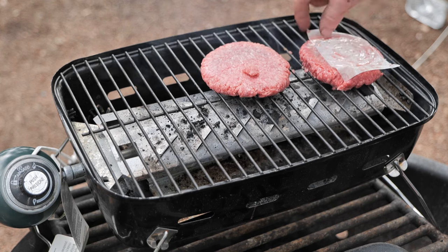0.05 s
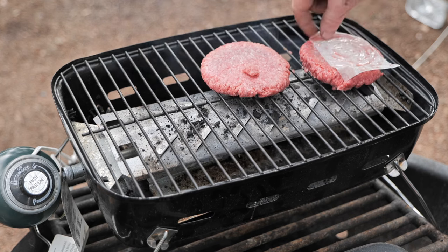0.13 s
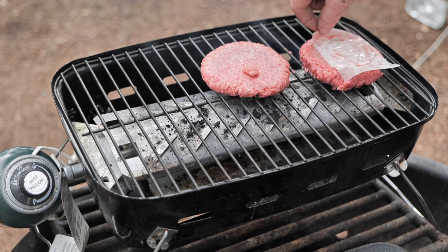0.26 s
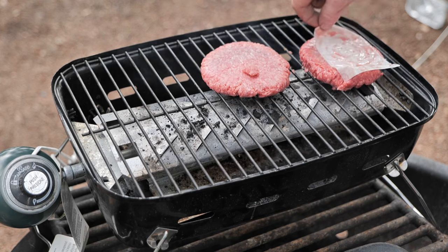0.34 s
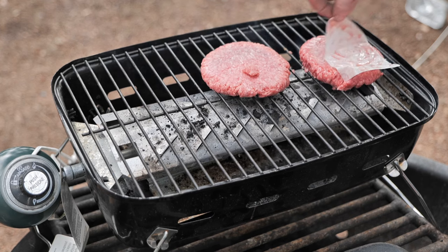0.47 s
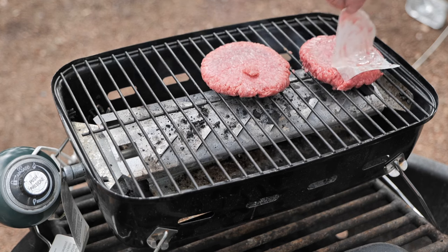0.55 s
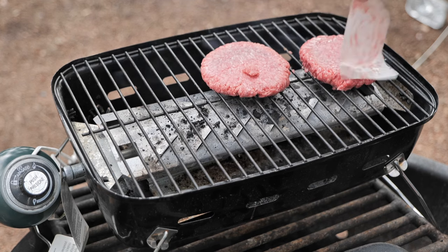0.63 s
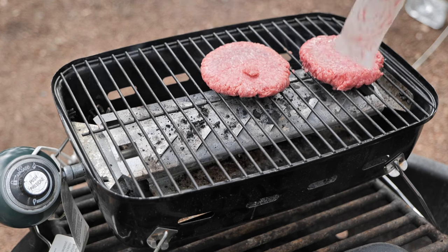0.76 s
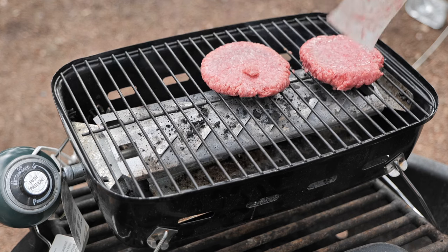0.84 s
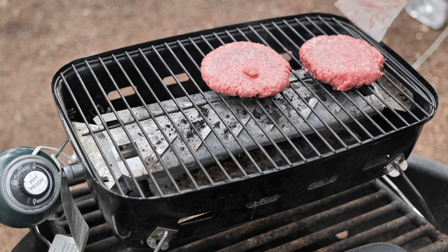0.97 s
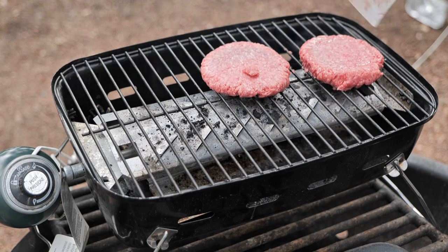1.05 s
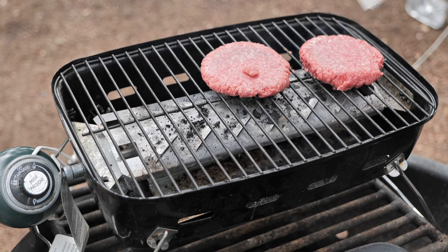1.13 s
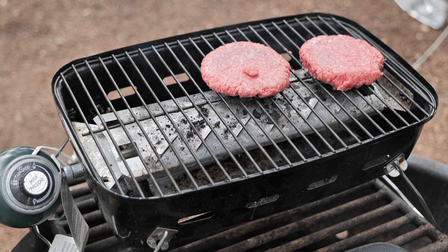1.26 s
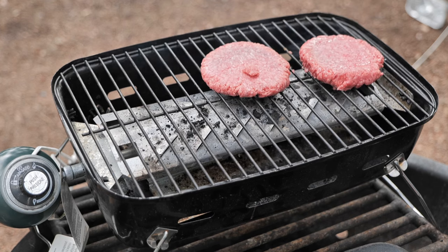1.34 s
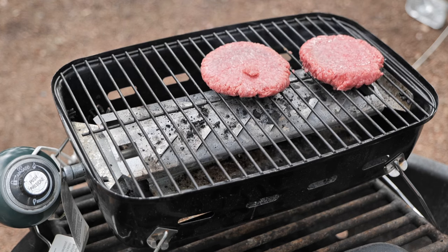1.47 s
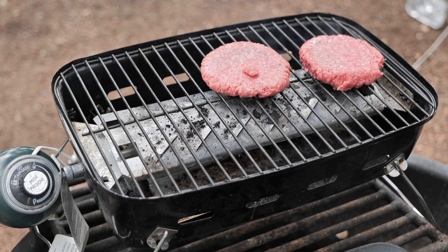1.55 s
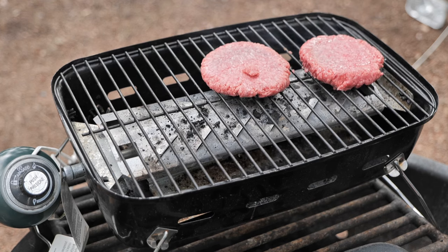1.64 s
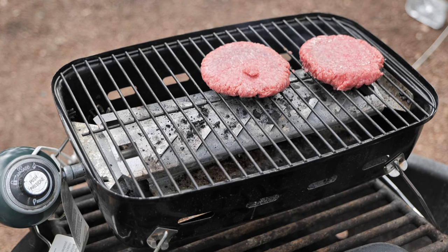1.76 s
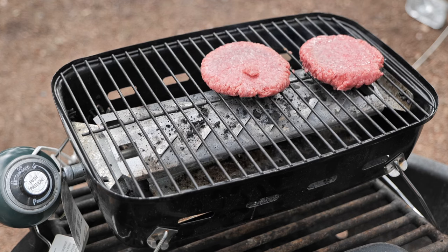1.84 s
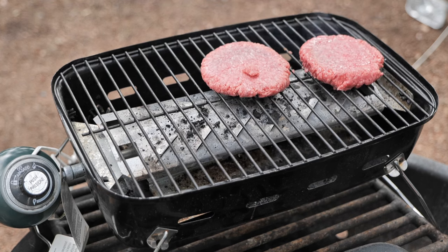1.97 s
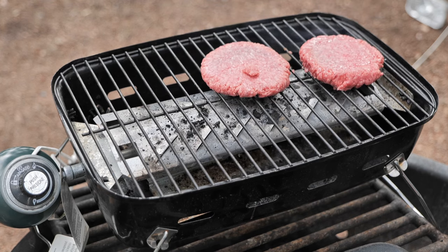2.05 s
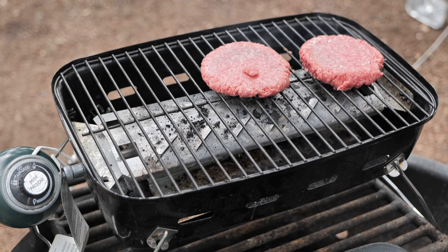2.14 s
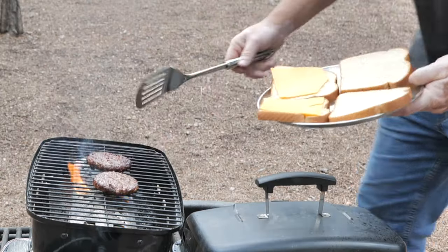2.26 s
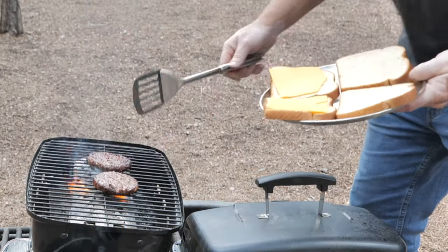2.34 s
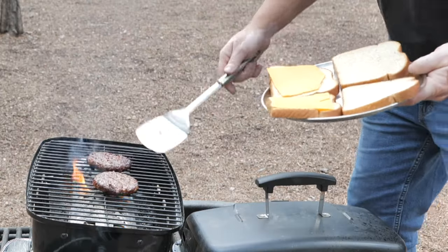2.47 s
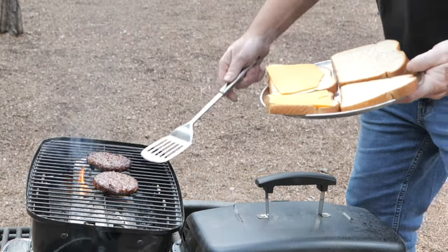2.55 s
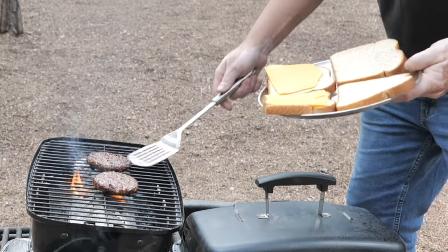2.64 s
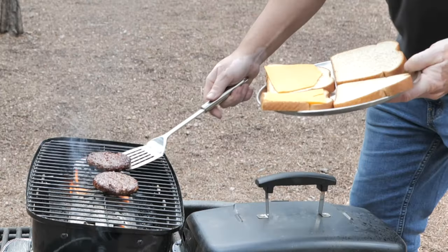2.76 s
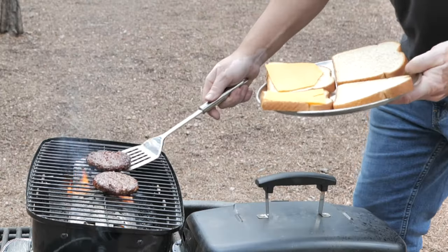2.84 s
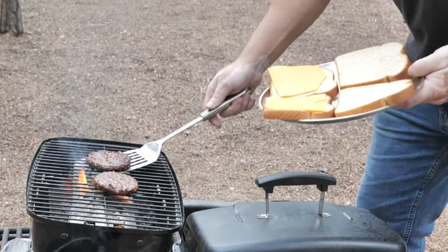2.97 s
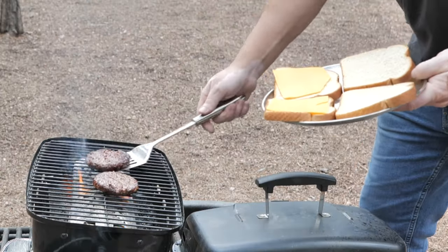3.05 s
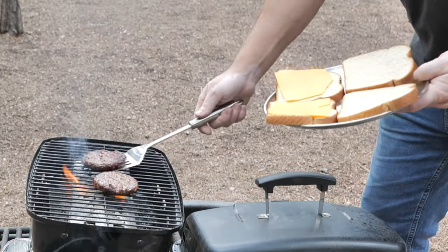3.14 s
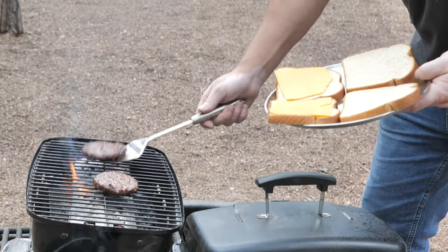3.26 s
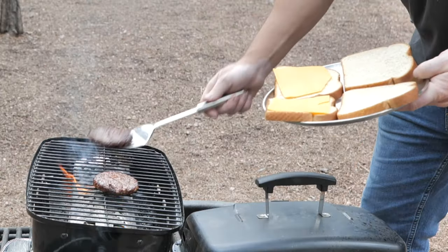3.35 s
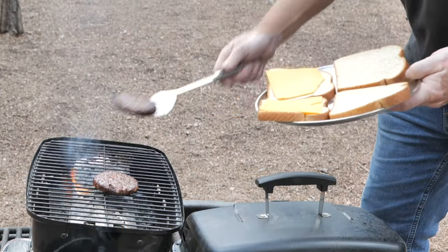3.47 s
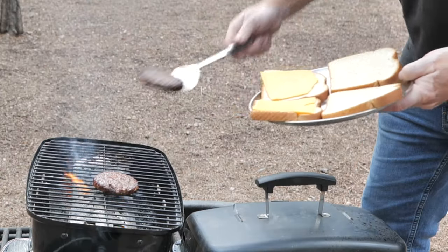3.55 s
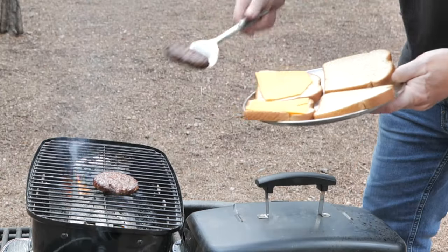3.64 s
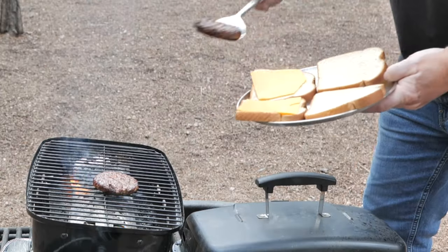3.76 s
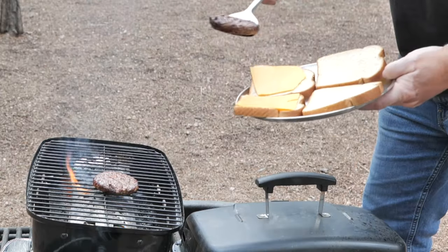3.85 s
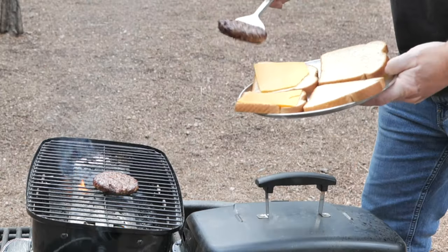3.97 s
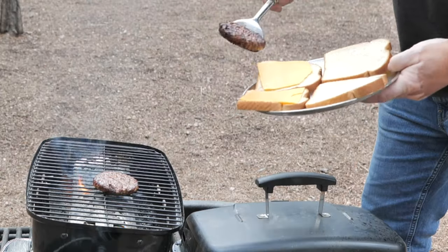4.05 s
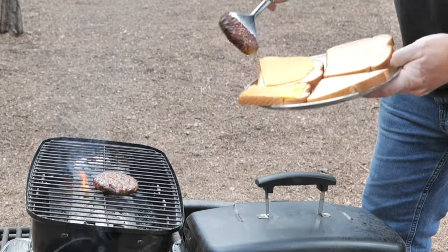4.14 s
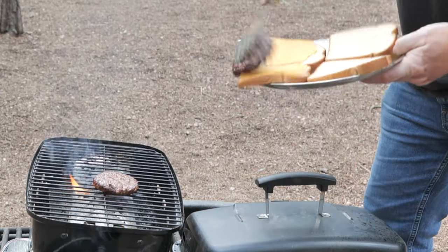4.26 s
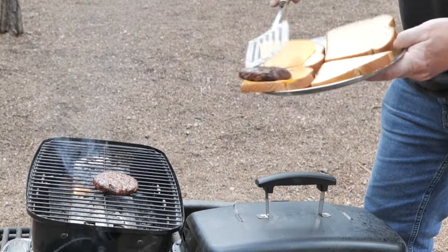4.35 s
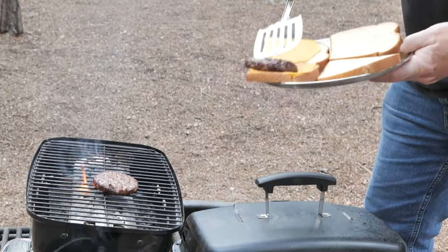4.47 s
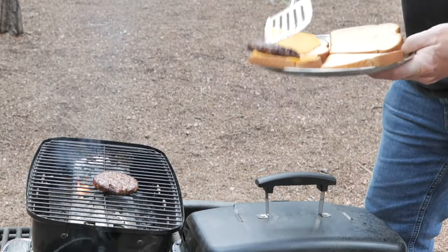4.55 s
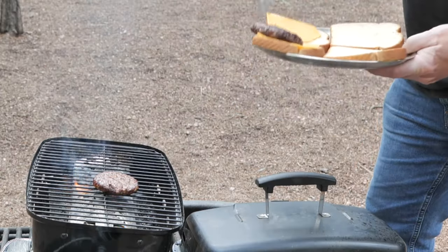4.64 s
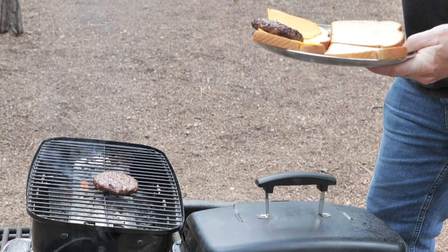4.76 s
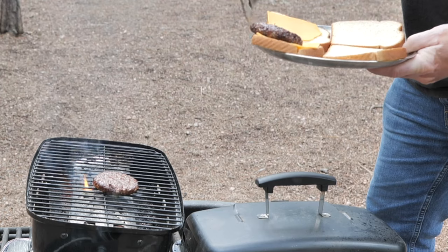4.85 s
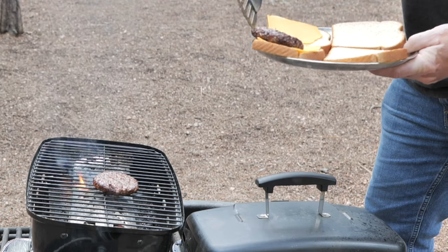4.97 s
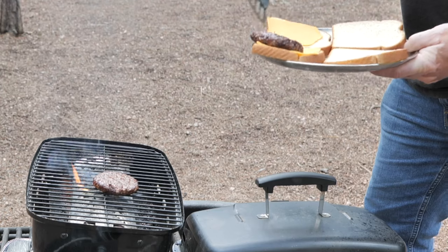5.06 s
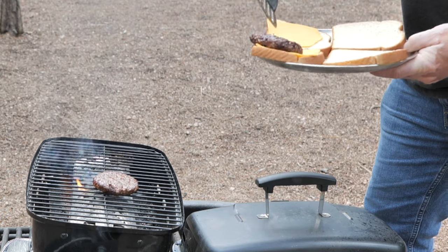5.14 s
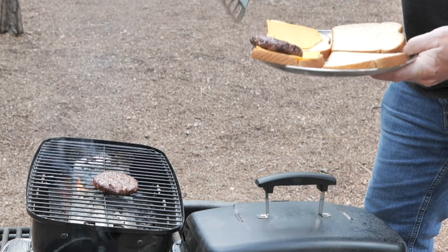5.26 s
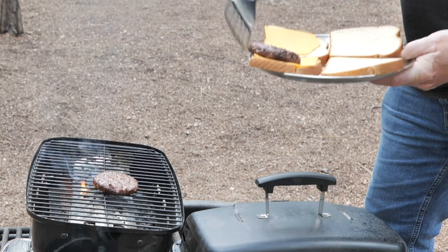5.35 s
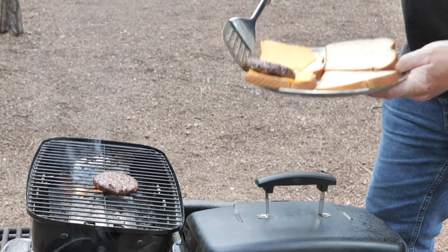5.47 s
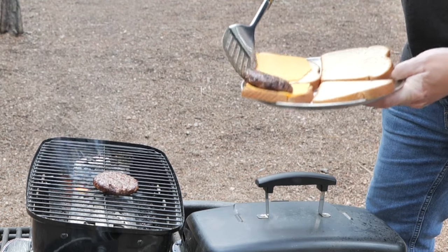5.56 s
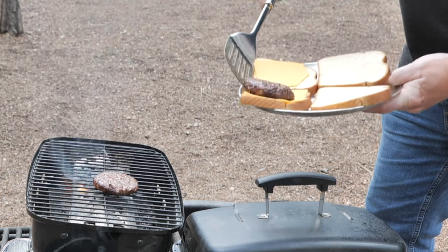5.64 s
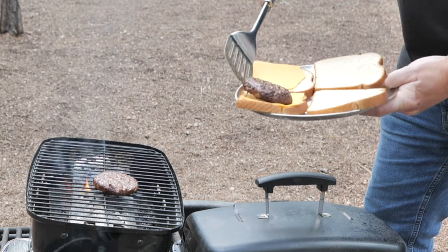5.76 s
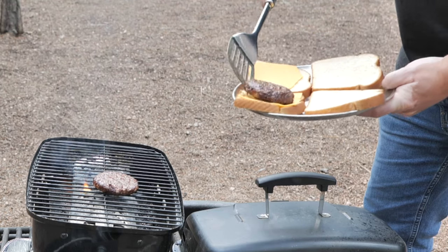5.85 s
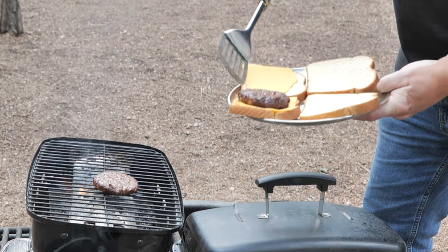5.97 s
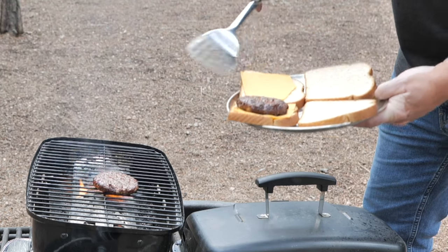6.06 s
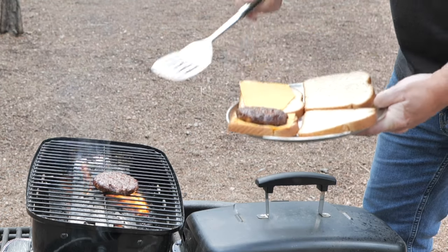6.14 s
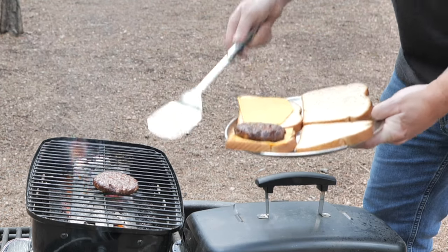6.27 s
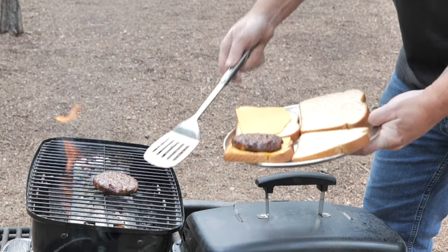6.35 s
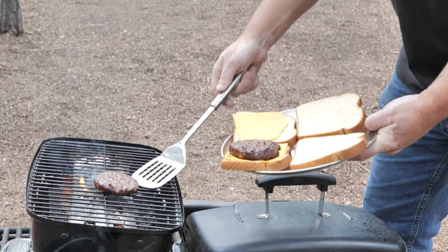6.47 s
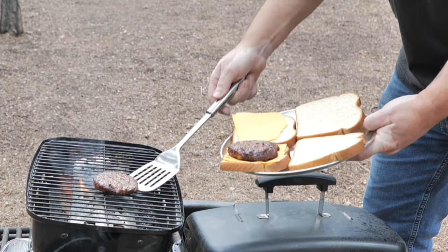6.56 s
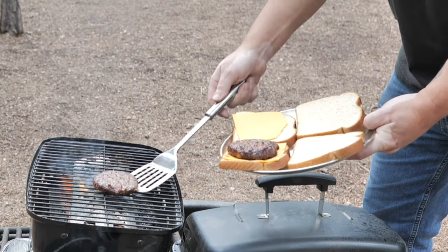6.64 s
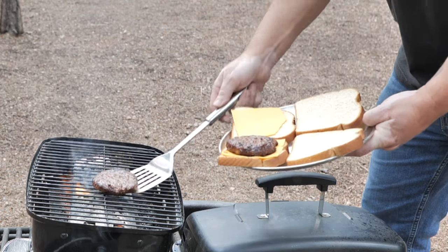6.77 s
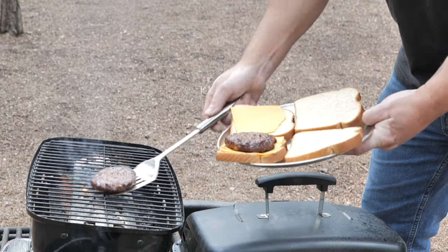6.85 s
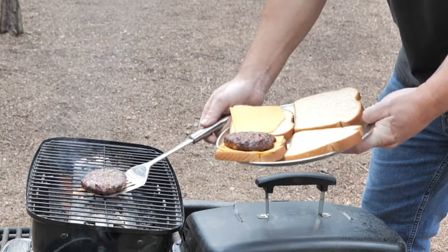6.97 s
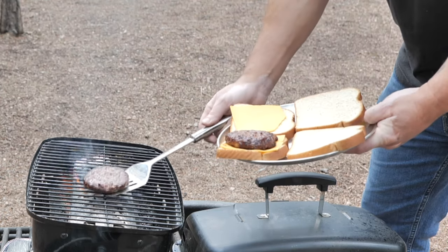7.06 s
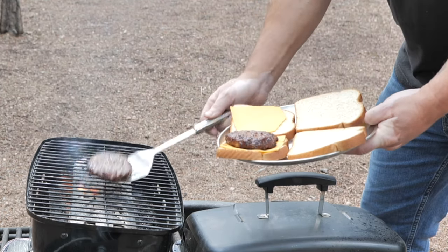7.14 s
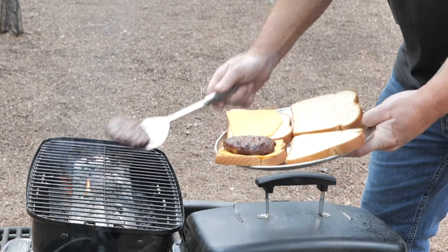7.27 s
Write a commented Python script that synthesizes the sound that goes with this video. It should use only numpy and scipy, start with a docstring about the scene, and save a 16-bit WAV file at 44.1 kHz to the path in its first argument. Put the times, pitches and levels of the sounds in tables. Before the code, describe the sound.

Raw burger patties sizzle and pop close up on a small gas grill, then from further off a metal spatula clangs and scrapes the grate.

```python
"""Burger patties sizzle on a small gas grill outdoors, heard first from close by, then, after a sudden cut,
from further off. The fizz is thousands of tiny random clicks; fat also bubbles, pops and ticks over a rushing
flame and low hum. A steel spatula lands on the grate and scrapes under a patty: filtered clicks set the grate
and blade ringing. Meat squishes, the blade taps a plate, a dry rasp passes and shoes grind on gravel, all as
shaped clicks or noise. Both channels carry the same sound."""
import sys
import numpy as np
from scipy import signal
from scipy.fft import rfft, irfft, next_fast_len
from scipy.io import wavfile

SR = 44100
rng = np.random.default_rng(int(sys.argv[2]) if len(sys.argv) > 2 else 0)


def int16_out(signal):
    """Quantize to a 16-bit WAV file."""
    q = np.round(np.clip(np.atleast_2d(signal).T, -1, 1) * 32767)
    wavfile.write(sys.argv[1], SR, q.astype(np.int16))


N = 322371
TIME = np.arange(N) / SR
CUT_S = 2.262   # the listening place changes here
STRAY_SPREAD_DB = 4   # size spread of the random pops and ticks


def from_db(db):
    """Turn decibels into a plain gain."""
    return 10 ** (np.asarray(db) / 20)


def rms_one(x):
    """Scale a sound to an average strength (rms) of 1."""
    return x / np.sqrt(np.mean(x ** 2) + 1e-20)


def at_hz(points, hz):
    """Read a table along a log-frequency axis."""
    points = np.array(points)
    return np.interp(np.log(hz + 1e-3), np.log(points[:, 0]), points[:, 1])


def stroke(s, rise_s, length_s, fall_s, sag_db_per_s=0):
    """Gain of a movement: builds up until s, holds or sags, then dies away (rise and fall span 20 dB)."""
    t = TIME - s
    outside = np.maximum(-t, 0) / rise_s + np.maximum(t - length_s, 0) / fall_s
    return from_db(-20 * np.minimum(outside, 10) - sag_db_per_s * np.clip(t, 0, length_s))


def drift(per_s):
    """Smooth random wandering: straight lines between chance values of spread 1."""
    knots = rng.standard_normal(4000)
    return np.interp(TIME * per_s, np.arange(len(knots)), knots)


def colour(x, spectrum):
    """Filter with the given spectrum and unit power gain, its response as early as possible (minimum phase)."""
    size = next_fast_len(len(x) + 4096, real=True) // 2 * 2
    gain = rms_one(from_db(at_hz(spectrum, np.arange(size // 2 + 1) * SR / size)))
    # folding the cepstrum forward in time gives the minimum phase
    cepstrum = irfft(np.log(gain), size)
    cepstrum[1:size // 2] *= 2
    cepstrum[size // 2 + 1:] = 0
    return irfft(rfft(x, size) * np.exp(rfft(cepstrum)), size)[:len(x)]


def resonate(x, peaks):
    """Parallel damped resonances of (frequency [Hz], width [Hz], level [dB])."""
    out = 0
    for k, (hz, width, db) in enumerate(peaks):
        r = np.exp(-np.pi * width / SR)
        top = np.array([1, 0, -1]) * (1 - r * r) / 2
        bottom = [1, -2 * r * np.cos(2 * np.pi * hz / SR), r * r]
        # neighbours get opposite signs
        out = out + (-1) ** k * from_db(db) * signal.lfilter(top, bottom, x + 1e-18)
    return out


def grains(per_s, spread_db, hiss_db):
    """Random clicks, of uneven sizes, over the hiss of countless tiny ones; rms 1."""
    sizes = from_db(spread_db * np.minimum(rng.exponential(1, N), 5.5)) * rng.choice([-1, 1], N)
    clicks = rms_one(sizes * (rng.random(N) < per_s / SR))
    return rms_one(clicks + from_db(hiss_db) * rng.standard_normal(N))


def reflect(x, lag_s=0.00113, share=.5):
    """Repeat each click a moment later, as a hard surface close by or a rebound does."""
    return x + share * np.interp(TIME - lag_s, TIME, x, left=0)


def add(out, s, sound):
    """Mix a short sound in at time s."""
    start = max(0, round(s * SR))
    out[start:start + len(sound)] += sound[:N - start]


def strays(per_s, start_s, end_s, db):
    """Rows (time [s], level [dB], chance value of spread 1) for faint events scattered over a stretch of time."""
    span_s, even = end_s - start_s, np.sqrt(12)   # even: gives a flat random draw a spread of 1
    rows = rng.random((200, 3))[:round(per_s * span_s)]
    return [(start_s + when * span_s, db + STRAY_SPREAD_DB * even * (size - .5), even * (kind - .5))
            for when, size, kind in rows]


# rush of the flame at each place: (frequency [Hz], relative level [dB per Hz])
FLAME_NEAR = [(65, -33), (110, 1), (141, 0), (290, -7.5), (367, -3.5), (740, -5.5), (1040, -13),
              (1210, -10.5), (1390, -17), (1580, -8.5), (1800, -17), (2340, -42), (3960, -120)]
FLAME_FAR = [(65, -33), (110, -2), (255, -8), (290, -3), (338, -7.5), (380, -7), (579, -13.5), (991, -8),
             (1180, -13.5), (1310, -12.5), (1800, -11.5), (2340, -38), (3960, -120)]
# low hum at the near and the far place: (pitch [Hz], tone level [dB], rumble level [dB])
HUM_LEVEL = [(70.6, -53, -55.5), (85.6, -57, -60)]
FLAME_NEAR_DB, FLAME_FAR_DB = -52, -56


def flame(near):
    """Soft rush of burning gas and a wavering low hum, higher at the second place."""
    out = near * from_db(FLAME_NEAR_DB) * colour(rng.standard_normal(N), FLAME_NEAR)
    out += (1 - near) * from_db(FLAME_FAR_DB) * colour(rng.standard_normal(N), FLAME_FAR)
    for share, (hz, tone_db, rumble_db) in zip([near, 1 - near], HUM_LEVEL):
        tone = np.sqrt(2) * np.sin(2 * np.pi * np.cumsum(hz + 0.62 * drift(5.5)) / SR)
        rumble = resonate(rng.standard_normal(N), [(hz, 45, 0)])
        rumble = rms_one(resonate(rumble, [(hz, 90, 0)]))
        out += share * (tone * from_db(tone_db + 0.45 * drift(15)) + rumble * from_db(rumble_db))
    return out


RASP_S, RASP_RISE_S, RASP_LENGTH_S, RASP_FALL_S, RASP_DB = 2.54, 0.076, 0.025, 0.05, -37


def rasp():
    """A short dry rasp: quick uneven slips in the middle register."""
    slips = grains(per_s=2000, spread_db=5.0, hiss_db=-2.0)
    slips = slips * from_db(RASP_DB) * stroke(RASP_S, RASP_RISE_S, RASP_LENGTH_S, RASP_FALL_S)
    return colour(slips, [(300, -14), (750, -1), (1200, -1.5), (1900, -4.5), (2600, -19), (8000, -40)])


# a sole turns on the gravel: (time at full weight [s], rise [s], length [s], level [dB])
SCUFFS = [(2.382, .05, .09, -42), (6.169, 0.17, 0.062, -28)]
# sound of the stones, then of the fine grit: (frequency [Hz], relative level [dB per Hz])
GRAVEL = [(41, -76), (70, -13), (156, -4), (198, -19), (251, -4.5), (382, -1.5), (615, -6), (686, -13.5),
          (902, -4.5), (1250, -3), (1530, -15), (1870, -3), (2170, -13), (3820, -11), (5500, -18.5),
          (7150, -27), (12100, -120)]
GRIT = [(3000, -7), (5000, -5), (8000, -4), (16000, -11.5)]
SCUFF_FALL_S = 0.12
# fine grit slides under light weight already: it follows only a share of the swing in dB
GRIT_DB, GRIT_FOLLOWS = -24.5, 0.56


def shoes():
    """Stones grind under a sole in uneven clumps while fine grit hisses above them."""
    weight = sum(from_db(db) * stroke(s, rise_s, length_s, SCUFF_FALL_S)
                 for s, rise_s, length_s, db in SCUFFS)
    clumps = from_db(2.4 * drift(130))
    stones = grains(per_s=6500, spread_db=4.0, hiss_db=-4.5) * weight
    grit = grains(per_s=7500, spread_db=3.5, hiss_db=-12) * weight ** GRIT_FOLLOWS
    return colour(stones * clumps, GRAVEL) + from_db(GRIT_DB) * colour(grit * clumps, GRIT)


# soft contacts of meat, bread and blade: (time [s], level [dB], length [s])
SQUISHES = [(3.057, -43.5, 0.13), (3.39, -44.5, 0.045), (3.523, -40.5, 0.042), (4.129, -46, 0.033),
            (4.333, -40, 0.048), (4.385, -41.5, 0.023), (4.648, -48.5, 0.073), (4.925, -42.5, 0.022),
            (5.542, -45, 0.038), (7.008, -39.5, 0.038), (7.179, -39.5, 0.03)]
# dull sound of those contacts: (frequency [Hz], relative level [dB per Hz])
SOFT = [(50, -1), (150, -2.5), (420, 2), (900, -11.5), (2000, -12), (5000, -16.5), (14000, -27.5)]
# the plate, damped by bread and hand: (frequency [Hz], width [Hz], level [dB])
PLATE = [(432, 96, -1.5), (803, 51, 6), (1284, 240, 3.5), (1800, 67, -1.5), (2110, 130, 4), (2800, 180, 0),
         (3490, 340, -4), (4310, 200, -4)]
# patty and blade knock on the plate: (time [s], level [dB], contact hardness [Hz])
PLATE_TAPS = [(4.394, -36.5, 850), (4.841, -43.5, 1000), (4.918, -45, 1030), (4.998, -43, 700),
              (5.054, -45.5, 1310), (5.135, -48, 3000), (5.25, -40, 2500), (5.454, -35, 2470)]
# the blade nudges the patty about on the plate
NUDGE_S, NUDGE_LENGTH_S, NUDGE_FADE_S, NUDGE_DB = 4.78, .75, 0.081, -55
REBOUND_S, REBOUND_DB = .014, -13   # each knock touches a second time


def serving():
    """Meat squishes as it is lifted and dropped; the blade rubs and taps at the plate."""
    press = sum(from_db(db) * np.clip((TIME - s) / 0.007, 0, 1) * np.exp(-((TIME - s) / length) ** 2)
                for s, db, length in SQUISHES)
    squish = colour(press * grains(per_s=2500, spread_db=-1.5, hiss_db=-9.5), SOFT)
    rub = rms_one(resonate(grains(per_s=760, spread_db=4.5, hiss_db=0), PLATE))
    rub = rub * stroke(NUDGE_S, NUDGE_FADE_S, NUDGE_LENGTH_S, NUDGE_FADE_S) * from_db(NUDGE_DB)
    taps, t = np.zeros(N), TIME[:SR // 20]
    for s, db, hard_hz in PLATE_TAPS:
        # a soft contact leaves the high modes quiet
        band = signal.butter(2, [250, hard_hz], "band", fs=SR, output="sos")
        push = signal.sosfilt(band, rng.standard_normal(len(t))) * np.exp(-t / 0.0057)
        tap = rms_one(resonate(push, PLATE)) + from_db(-8) * rms_one(push)
        add(taps, s, from_db(db) * tap / np.std(tap[:SR // 80]))
    return squish + rub + reflect(taps, lag_s=REBOUND_S, share=from_db(REBOUND_DB))


# the edge catches on a bar once
SQUEAK_S, SQUEAK_LENGTH_S, SQUEAK_HZ, SQUEAK_DB = 6.9, 0.011, 4600, -52


def squeak():
    """The blade's edge sticks and slips fast enough to sing for a moment: noise in a narrow band."""
    tone = resonate(rng.standard_normal(N), [(SQUEAK_HZ, 200, 0)])
    tone = rms_one(resonate(tone, [(SQUEAK_HZ, 300, 0)]))
    return from_db(SQUEAK_DB) * tone * np.exp(-((TIME - SQUEAK_S) / SQUEAK_LENGTH_S) ** 2)


# sound of a blow on the grill: (frequency [Hz], relative level [dB per Hz])
BLOW_COLOUR = [(53, -26), (90, -19), (156, -2), (403, -8), (458, -10.5), (683, 1), (899, -6.5), (1020, -1),
               (1110, -9), (2530, -15.5), (5300, -34), (14000, -35)]
# how fast the grill falls silent: (frequency [Hz], time to fall 60 dB [s])
GRILL_DECAY = [(120, 0.54), (320, 0.73), (840, 0.67), (2200, 0.31), (6000, 0.44), (14000, 0.029)]
# ringing of the grate while the blade presses on it: (frequency [Hz], width [Hz], level [dB])
GRATE = [(422, 180, -6), (668, 20, 1), (816, 36, -2), (1017, 21, 8), (1180, 70, -7.5), (1447, 36, 1.5),
         (1660, 36, -1.5), (1860, 34, -10), (2580, 28, -9), (2968, 130, -6.5), (3850, 140, -17),
         (4770, 340, -19.5)]


def grill_response(free_width=0.32, bars_db=-3):
    """The thin steel box: a dense wash that dies first in the highest treble, and the clearer modes of the bars."""
    t, edges = TIME[:SR // 2], np.geomspace(80, 16000, num=14)
    wash = 0
    for low, high in zip(edges, edges[1:]):
        band_filter = signal.butter(2, [low, high], "band", fs=SR, output="sos")
        band = signal.sosfilt(band_filter, rng.standard_normal(len(t)))
        wash = wash + band * from_db(-60 * t / at_hz(GRILL_DECAY, np.sqrt(low * high)))
    wash = colour(wash * (1 + 0.21 * np.exp(-t / 0.0031)), BLOW_COLOUR)
    # once the blade bounces off, the bars ring longer
    free_bars = [(hz, width * free_width, db) for hz, width, db in GRATE]
    bars = resonate(rng.standard_normal(len(t)) * np.exp(-t / 0.0058), free_bars)
    return rms_one(wash) + from_db(bars_db) * rms_one(bars)


# spatula blows on the grate:
# (time [s], level [dB], rattle decay [s], brightness of the box [dB], clang relative to box [dB])
BLOWS = [(2.677, -34.5, 0.21, 14.5, -5), (2.775, -39.5, 0.034, 8, 0.5), (6.506, -27.5, 0.023, 7, -8),
         (7.184, -51.5, .02, 22, 10)]
# the steel blade's own short clang: (frequency [Hz], width [Hz], level [dB])
BLADE = [(1021, 19, 11.5), (1650, 45, 3), (2170, 55, -1.5), (2505, 70, 6.5), (2740, 63, 2), (2960, 110, 0),
         (3800, 270, -7), (4400, 180, -6)]
# pushes of the blade over the bars: (time at full force [s], rise [s], length [s], level at full force [dB])
SCRAPES = [(2.689, 0.04, 0.56, -35), (3.045, 0.051, .015, -47), (6.84, .09, 0.16, -42.5)]
# sound of the rubbing: (frequency [Hz], relative level [dB per Hz])
SCRAPE_COLOUR = [(53, -38), (90, -8), (209, -4), (420, -4), (615, -10.5), (1060, -7), (1520, -9),
                 (1660, -10.5), (2870, -10.5), (3190, -8.5), (14000, -27)]
SCRAPE_SAG_DB_PER_S, SCRAPE_FALL_S = 19.5, 0.14   # a push eases as the blade gets under the patty


def spatula():
    """The blade lands with a clang and sets the loose grate rattling, then sticks and slips over the bars."""
    out, t = np.zeros(N), TIME[:SR // 2]
    swell = 1 - np.exp(-t / .004)
    for s, db, rattle_s, bright_db, clang_db in BLOWS:
        touches = grains(per_s=2000, spread_db=1.8, hiss_db=-6)[:len(t)] * np.exp(-t / rattle_s)
        box = rms_one(grill_response()) + from_db(-13.5) * rms_one(colour(touches, BLOW_COLOUR))
        box = colour(box * swell, [(1200, 0), (4000, bright_db)])   # the box answers a moment after the blade
        clang = resonate(touches * np.exp(-t / 0.15), BLADE)
        blow = rms_one(box) + from_db(clang_db) * rms_one(clang)
        add(out, s, from_db(db) * blow / np.std(blow[:SR // 25]))
    slips = grains(per_s=1600, spread_db=3.0, hiss_db=-6) * from_db(2.05 * drift(70))
    ring_share = .3   # part of the rubbing power that rings in the grate
    rubbing = np.sqrt(1 - ring_share) * rms_one(colour(slips, SCRAPE_COLOUR))
    rubbing = rubbing + np.sqrt(ring_share) * rms_one(resonate(slips, GRATE))
    force = sum(from_db(db) * stroke(s, rise_s, length_s, SCRAPE_FALL_S, SCRAPE_SAG_DB_PER_S)
                for s, rise_s, length_s, db in SCRAPES)
    return out + rubbing * force


# the loudest ticks: spitting fat, shifting grit and the sharp edge of a spatula blow:
# (time [s], crack level [dB], body relative to crack [dB])
TICKS = [(1.276, -20.5, -13), (2.368, -22, -25), (2.679, -25, -6), (3.0724, -19.5, -13),
         (3.8572, -25.5, -5.5), (3.8896, -26.5, -16), (3.933, -18.5, -19), (4.0683, -23.5, -12.5),
         (4.1473, -26.5, -10), (4.3857, -24, -7), (4.4024, -23, -8), (4.613, -21.5, -21),
         (4.7015, -19.5, -31), (5.0089, -22.5, -5.5), (5.1357, -19, -10.5), (5.2217, -25, -31),
         (5.24, -23, -7), (5.2495, -28, -11), (5.407, -17.5, -24), (5.453, -17.5, -14.5), (5.487, -27, -10),
         (5.4997, -21, -30), (5.9434, -28.5, -2), (6.0863, -21.5, -1.5), (6.2408, -17.5, -2),
         (6.2731, -8.5, -26), (6.2986, -22, -3.5), (6.3305, -19.5, -2), (6.6283, -18, -19)]
# fainter ticks come at random after the cut
STRAY_TICKS_PER_S, STRAY_TICK_DB, STRAY_BODY_DB = 11, -32, -17


def ticks(rise_s=0.001094, crack_s=.0001, body_s=0.0028):
    """Each tick is a needle-sharp crack with a few milliseconds of mid-range rattle."""
    cracks, bodies, t = np.zeros(N), np.zeros(N), TIME[:SR // 40]
    faint = [(s, db, STRAY_BODY_DB + 3 * chance)
             for s, db, chance in strays(STRAY_TICKS_PER_S, CUT_S, N / SR, STRAY_TICK_DB)]
    rows = list(TICKS) + faint
    for (s, db, body_db), noise in zip(rows, rng.standard_normal((len(rows), 2, len(t)))):
        crack = noise[0] * (np.exp(-t / crack_s) + 0.21 * np.exp(-t / body_s))
        add(cracks, s + rise_s, from_db(db) * crack / np.abs(crack).max())
        add(bodies, s + rise_s, from_db(db + body_db) * noise[1] * np.exp(-t / body_s))
    bodies = colour(bodies, [(150, -29), (500, -2.5), (1300, -1), (2700, 4.5), (5000, -7), (14000, -30)])
    cracks = colour(cracks, [(1000, -0.5), (4000, -0.5), (9000, 0), (16000, -9.0)])
    return reflect(from_db(-1.5) * cracks + bodies, share=0.057)


# the loudest dull pops of fat, and the slap of a patty set down: (time [s], level [dB], pitch [Hz])
POPS = [(0.082, -33.5, 746), (0.201, -28.5, 1180), (0.308, -36.5, 450), (0.357, -30.5, 729),
        (0.366, -29, 783), (0.395, -27, 480), (0.46, -31.5, 490), (0.913, -33.5, 552), (1.128, -28.5, 690),
        (1.153, -30.5, 494), (1.282, -27.5, 794), (1.323, -31, 830), (1.651, -31, 460), (1.97, -30, 566),
        (2.021, -33, 657), (2.26, -27, 1080), (3.623, -27.5, 470), (4.395, -26, 791)]
# fainter pops come at random, only before the cut
STRAY_POPS_PER_S, STRAY_POP_DB, STRAY_POP_HZ = 7, -36.5, 770


def pops(swell_s=0.00335, cycles=0.32, snap_db=-7):
    """Steam or juice swells and bursts, or a patty slaps down: one swing of pressure with a small snap on top."""
    out, t = np.zeros(N), TIME[:SR // 40] - swell_s
    faint = [(s, db, STRAY_POP_HZ * np.exp(0.37 * chance))
             for s, db, chance in strays(STRAY_POPS_PER_S, 0, CUT_S, STRAY_POP_DB)]
    rows = list(POPS) + faint
    for (s, db, hz), noise in zip(rows, rng.standard_normal((len(rows), len(t)))):
        swing = np.sin(2 * np.pi * hz * t + .5 * noise[0]) * np.exp(-np.abs(t) * hz / cycles)
        snap = resonate(noise * (t > 0) * np.exp(-np.abs(t) / 0.0029), [(1250, 1300, 0)])
        pop = swing / np.abs(swing).max() + from_db(snap_db) * snap / np.abs(snap).max()
        add(out, s, from_db(db + 1.0) * pop)
    return out


BUBBLES_NEAR_DB, BUBBLES_FAR_DB = -54, -63   # before the level wavers


def bubbling(near):
    """Larger bubbles under the meat collapse in bunches, each with a cycle or two of low pitch."""
    out = 0
    for hz in np.geomspace(400, 950, num=4):
        bursts = grains(per_s=22, spread_db=2.5, hiss_db=-9)
        out = out + resonate(bursts, [(hz, 0.43 * hz, 0)]) / np.sqrt(hz)
    level = near * from_db(BUBBLES_NEAR_DB) + (1 - near) * from_db(BUBBLES_FAR_DB)
    return rms_one(out) * from_db(2 * drift(12)) * level


# colour of the frying at each place: (frequency [Hz], relative level [dB per Hz])
FIZZ_NEAR = [(710, -35.5), (1200, -6), (1380, -18), (1590, 1), (1810, -6), (2130, 1.5), (3030, 0),
             (4020, 2), (4930, -3.5), (6740, -4.5), (9830, -9), (13300, -7), (15800, -10)]
FIZZ_FAR = [(710, -37), (1200, -6), (1320, -2), (1570, -16), (1690, -4.5), (2320, -5), (2550, -1.5),
            (3270, -5), (3640, -3.5), (7190, -10.5), (15800, -14)]
# a patty leaves the grate: (time [s])
LIFTS_S = [3.5, 7.15]
FIZZ_NEAR_DB, FIZZ_FAR_DB = -44.5, -48.5   # settled near level; far level before any patty is lifted
FRESH_DB, SETTLE_S = 3, 0.56   # a patty just laid down fries louder, then settles
LIFT_LOSS_DB, LIFT_FADE_S = 2.1, 0.096   # each lifted patty takes its share of the fizz with it


def frying(near):
    """Tiny steam bubbles burst in the fat; from further off single spits stand out more."""
    lifted = sum(np.clip((TIME - s) / LIFT_FADE_S, 0, 1) for s in LIFTS_S)
    close = colour(grains(per_s=5000, spread_db=3.5, hiss_db=0), FIZZ_NEAR)
    close = close * from_db(FIZZ_NEAR_DB + FRESH_DB * np.exp(-TIME / SETTLE_S))
    far = colour(grains(per_s=1500, spread_db=5.0, hiss_db=2.0), FIZZ_FAR)
    far = far * from_db(FIZZ_FAR_DB - LIFT_LOSS_DB * lifted)
    return (near * close + (1 - near) * far) * from_db(0.85 * drift(45))   # the level flickers


def scene():
    """Mix all the sources; near goes quickly from 1 to 0 at the cut."""
    near = np.clip((CUT_S - TIME) / 0.0043, 0, 1)
    cook = rasp() + shoes() + serving() + squeak() + spatula()
    grill = flame(near) + ticks() + pops() + bubbling(near) + frying(near)
    mono = cook + grill
    return np.array([mono, mono])


CUTOFF_HZ = 15800


def record(dry):
    """The microphone drops the deepest bass; the top is cut steeply."""
    dry = signal.sosfilt(signal.butter(2, 42, "high", fs=SR, output="sos"), dry)
    return signal.sosfilt(signal.ellip(10, .1, 70, CUTOFF_HZ, fs=SR, output="sos"), dry)


dry = scene()
out = record(dry)
int16_out(out)
```